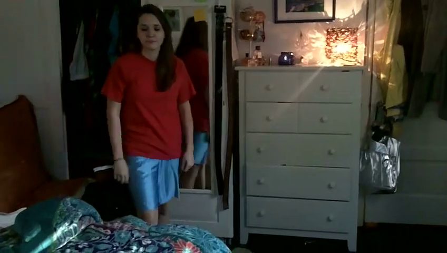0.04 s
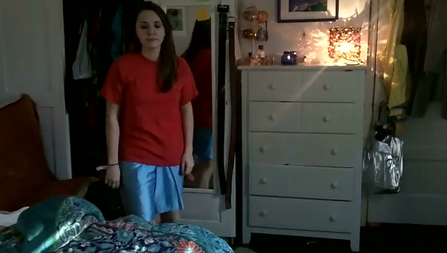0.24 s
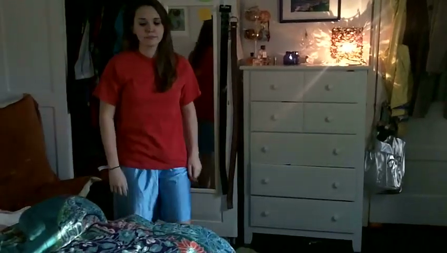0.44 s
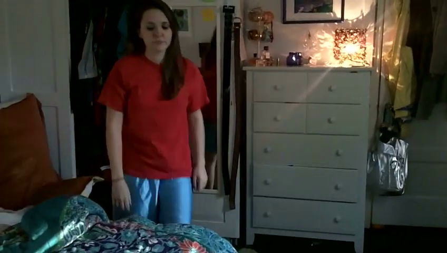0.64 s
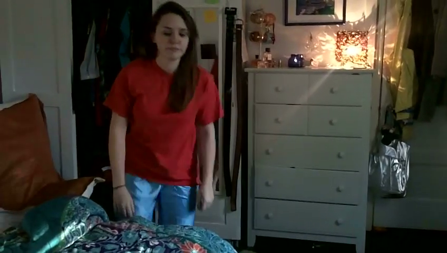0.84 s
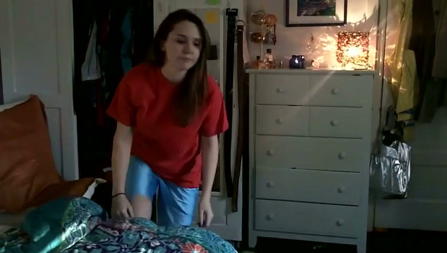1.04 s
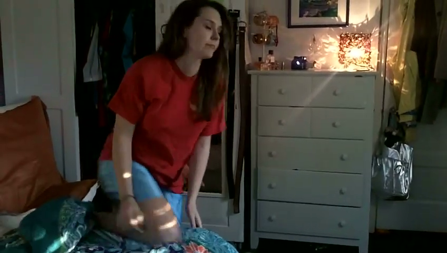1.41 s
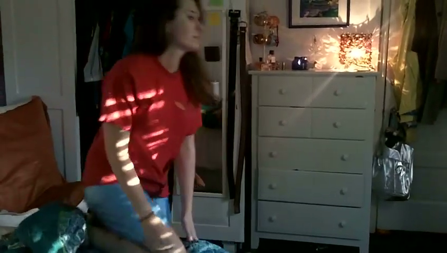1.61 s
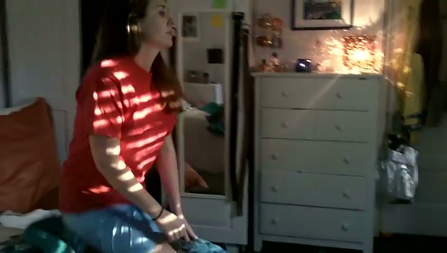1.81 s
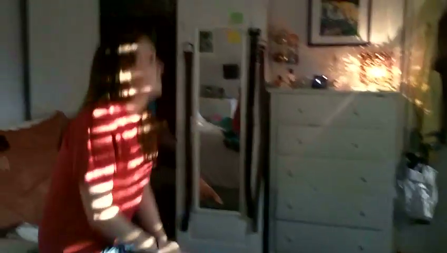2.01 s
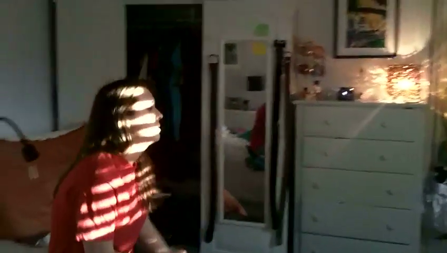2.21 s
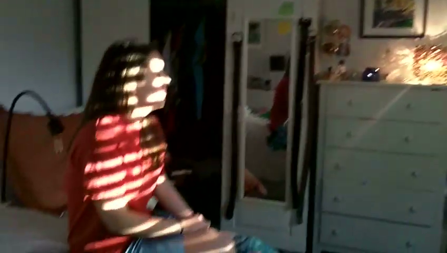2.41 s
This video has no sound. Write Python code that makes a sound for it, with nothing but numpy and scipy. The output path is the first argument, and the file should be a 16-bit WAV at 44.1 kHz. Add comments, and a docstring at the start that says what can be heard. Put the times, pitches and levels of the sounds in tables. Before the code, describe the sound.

Someone climbs onto a bed with soft thumps, rustling bedding and small creaks.

```python
"""In a quiet bedroom, someone steps up to a bed, kneels on it and sits down.
Footsteps shake the floor, and the mattress thuds and knocks its wooden slats under the weight.
Clothes and quilt swish as they rub. The frame snaps once as a joint lets go, then creaks, and a
rubbing spring squeaks. Under it all lie a low rumble, faint hiss and a thin electrical buzz."""
import sys
import numpy as np
from scipy import signal
from scipy.fft import rfft, irfft
from scipy.io import wavfile
from scipy.ndimage import uniform_filter1d

SR = 44100
rng = np.random.default_rng(int(sys.argv[2]) if len(sys.argv) > 2 else 0)


def bounce(signal):
    """Save signal as a 16-bit WAV file at the path given by the first command-line argument."""
    frames = np.transpose(np.atleast_2d(signal))
    limited = np.clip(frames, -1, 1)
    pcm = np.round(limited * 32767).astype(np.int16)
    wavfile.write(sys.argv[1], SR, pcm)


N = 112454
T = np.arange(N) / SR

# the notes the wooden slats ring at (pitch [Hz], level [dB], ring time [s])
SLAT_MODES = [(568.5, -0.5, 0.15), (817, 1.5, 0.082), (967, -8, .12)]


def floorboards():
    """Each footstep sways the floor; its deep note sags as the weight settles. A rumble lies below."""
    # footsteps (time [s], level [dB])
    steps = [(0.206, -19), (0.355, -38), (0.488, -40), (0.788, -36), (0.882, -39), (1.023, -46),
             (2.192, -31.5), (2.254, -36)]
    # tone of the rumble (frequency [Hz], level [dB])
    rumble_tone = [(10, 4.5), (26, 0), (55, -14.5), (200, -70.5)]
    start_hz, sag_share, sag_s, peak_s = 37.25, 0.41, 0.039, 0.028
    t, out = T[:SR // 2], np.zeros(N)
    hz = start_hz * (1 - sag_share * (1 - np.exp(-t / sag_s)))
    sway = (t / peak_s * np.exp(1 - t / peak_s)) ** 1.49 * sine(hz)
    for s, db in steps:
        add(out, s, amp(db) * sway)
    return out + amp(-49.5) * colour(rng.standard_normal(N), rumble_tone)


def mattress():
    """Each soft push rings the spot where it lands and the low notes of the frame."""
    # weight landing on the mattress (time [s], level [dB], pitch [Hz])
    thuds = [(.322, -51, 240.4), (1.615, -47, 161.5), (1.645, -43, 148), (1.708, -38.5, 178),
             (2.064, -43, 160), (2.116, -43, 153), (2.173, -35.5, 111), (2.211, -37, 115),
             (2.233, -33, 133), (2.263, -33.5, 131.5), (2.452, -34.5, 149.5)]
    # low notes of the frame (pitch [Hz], level [dB], ring time [s])
    frame_notes = [(106.7, 5, 0.33), (261.6, -4.5, 0.43), (346, -6, 0.21), (452.5, -14, 0.24)]
    rise_s, ring_s = 0.0015, 0.11
    out, frame = np.zeros(N), amp(-7.5) * ring(frame_notes)
    soft_start = 1 - np.exp(-(T[:len(frame)] / rise_s) ** 2)
    for s, db, hz in thuds:
        add(out, s, amp(db) * soft_start * (ring([(hz, 0, ring_s)]) + frame))
    return out


def cloth():
    """Clothes and quilt rub all along and swish with each move; once, a knee slides over the quilt."""
    # swishes (peak time [s], rise [s], fall [s], muffled push [dB], brush [dB], fizz [dB])
    swishes = [(0.042, 0.052, 0.016, -62.5, -94, -81), (0.244, 0.039, 0.063, -70, -65.5, -70),
               (0.332, 0.02, 0.033, -58, -59.5, -64), (.427, 0.01, 0.034, -58.5, -61.5, -59),
               (.812, 0.0036, 0.038, -65, -68, -63), (.89, 0.04, 0.033, -56, -67.5, -73),
               (0.943, 0.0058, .026, -62, -52, -62.5), (1.21, 0.072, 0.045, -66, -69, -70),
               (1.404, 0.013, 0.035, -58, -58.5, -69.5), (1.706, 0.01, 0.031, -54.5, -56, -51),
               (2.074, 0.012, 0.059, -53, -59, -73), (2.174, 0.019, 0.028, -47.5, -47, -55),
               (2.232, 0.014, 0.028, -49, -43, -50.5), (2.263, 0.013, 0.022, -40.5, -50, -81),
               (2.448, 0.012, 0.04, -47.5, -49, -57)]
    # constant rubbing of the bedding (time [s], level [dB])
    rubbing = [(0, -67.5), (.18, -72.5), (.4, -69), (.7, -74.5), (1, -70), (1.3, -71.5), (1.5, -66),
               (1.65, -60.5), (1.85, -61.5), (2.03, -60.5), (2.2, -59), (2.36, -56), (2.55, -58.5)]
    # tones of the cloth's low push, middle brush and high fizz (frequency [Hz], level [dB])
    push_tone = [(40, 13.5), (130, 10.5), (330, 5.5), (550, 5), (850, -1.5), (1500, -47), (4000, -56)]
    brush_tone = [(100, 4.5), (400, -3), (800, 3.5), (1400, 1), (2200, -1), (3000, -14), (5000, -38),
                  (9000, -59)]
    fizz_tone = [(1000, -45), (2300, -17), (3300, -3.5), (4200, -4.5), (4900, -8), (5600, -26.5),
                 (6800, -24.5), (8000, -51), (15000, -34)]
    # tones of the knee's bright slide and lower scrape (frequency [Hz], level [dB])
    slide_tone = [(3500, -12), (4800, 5), (6500, -5), (7300, -16), (8200, -29), (10000, -19), (15000, -35)]
    scrape_tone = [(450, -4.5), (780, 3), (950, -5), (1450, -1.5), (2280, -4), (5000, -44)]
    rub = amp(np.interp(T, *np.transpose(rubbing)))
    powers = np.outer(amp([-0.5, 0, -2.5]), rub) ** 2  # one row each: push, brush, fizz
    for peak_s, rise_s, fall_s, *levels_db in swishes:
        powers += np.outer(amp(levels_db), swell(peak_s, rise_s, fall_s)) ** 2
    slide = amp(-51.5) * swell(peak_s=1.703, rise_s=0.012, fall_s=0.039) * colour(fibres(), slide_tone)
    scrape = amp(-46) * swell(peak_s=1.702, rise_s=0.018, fall_s=0.036) * colour(fibres(), scrape_tone)
    out = slide + scrape
    for power, tone in zip(powers, (push_tone, brush_tone, fizz_tone)):
        out += np.sqrt(power) * colour(fibres(), tone)
    return out


def fibres():
    """Threads catch in thousands of tiny clicks over a smooth rubbing noise."""
    catches_per_s, spread_db, smooth_share = 4000, 2.5, 0.72
    sizes = rng.standard_normal(N) * amp(spread_db * np.minimum(rng.exponential(1, N), 4))
    catches = sizes * (rng.random(N) < catches_per_s / SR)
    return np.sqrt(1 - smooth_share) * unit(catches) + np.sqrt(smooth_share) * rng.standard_normal(N)


def slats():
    """The slats knock against the frame, muffled by the mattress."""
    # wooden knocks (time [s], level [dB])
    knocks = [(2.176, -44), (2.229, -52), (2.247, -41), (2.259, -39)]
    rise_s = 0.0025
    out, wood = np.zeros(N), ring(SLAT_MODES)
    soft_start = 1 - np.exp(-T[:len(wood)] / rise_s)
    for s, db in knocks:
        add(out, s, amp(db) * soft_start * wood)
    return out


def frame_snap():
    """A joint under load lets go in a quick run of bright, ringing cracks, heard as one snap."""
    # cracks (time [s], level [dB])
    cracks = [(1.9083, -29.5), (1.911, -32), (1.917, -30), (1.9305, -37), (1.9405, -36), (1.959, -42)]
    # notes each crack rings (pitch [Hz], level [dB], ring time [s])
    crack_notes = [(3410, -2, .03), (3490, -3, .03), (3880, -3, .022), (4390, -4, .025), (4750, -9, .025),
                   (5830, -13, .05), (5960, -20, .05), (7030, -25, .09)]
    # tone of each crack's burst of noise (frequency [Hz], level [dB])
    burst_tone = [(3300, -2), (4500, 0.5), (5400, -22), (9500, -18)]
    burst_fall_s, band_hz = 0.0034, [3100, 6600]
    ticks, bursts, tick = np.zeros(N), np.zeros(N), ring(crack_notes)
    for s, db in cracks:
        add(ticks, s, amp(db) * tick)
        add(bursts, s, amp(db) * np.exp(-T / burst_fall_s))
    noise = amp(-9) * bursts * colour(rng.standard_normal(N), burst_tone)
    return signal.sosfilt(signal.butter(3, band_hz, "bandpass", fs=SR, output="sos"), ticks + noise)


def spring_squeaks():
    """A rubbing spring sings one nearly steady note, with a weaker, wavering one just below it."""
    # squeaks (start [s], length [s], level [dB])
    squeaks = [(2.33, .038, -56), (2.391, .052, -52), (2.44, .08, -63)]
    main_hz, lower_hz = 3997, 3845
    main_waver, lower_waver, roughness = (
        unit(signal.fftconvolve(noise, np.hanning(170), "same")) for noise in rng.standard_normal((3, N)))
    main = sine(main_hz * (1 + .005 * main_waver))
    lower = amp(-6) * sine(lower_hz * (1 + .025 * lower_waver))
    note = unit((main + lower) * (1 + .65 * roughness))
    return note * sum(amp(db) * stroke(s, length) for s, length, db in squeaks)


def frame_creaks():
    """A joint sticks and slips in short, uneven runs, ringing itself and, more weakly, the slats."""
    # creaks (start [s], length [s], level [dB], pitch [Hz])
    creaks = [(1.799, 0.021, -59, 1395), (2.273, 0.025, -57.5, 1410), (2.355, 0.039, -57.5, 1397),
              (2.382, 0.053, -60, 770), (2.396, .06, -59.5, 1926), (2.433, 0.031, -54.5, 1394)]
    slips_per_s, unevenness, ring_s = 330, .6, .045
    pace = 1 + unevenness * unit(uniform_filter1d(rng.standard_normal(N), size=80))
    slips_so_far = np.floor(np.cumsum(slips_per_s * abs(pace)) / SR)
    slips = np.diff(slips_so_far, prepend=0)  # one click for each slip
    out, wood = np.zeros(N), amp(-9) * ring(SLAT_MODES)
    for s, length, db, hz in creaks:
        creak = signal.fftconvolve(slips * stroke(s, length), ring([(hz, 0, ring_s)]) + wood)[:N]
        out += amp(db) * unit(creak) * np.sqrt(length / T[-1])  # level over the creak's own length
    return out


def room(x):
    """The short, blurred echo of a furnished bedroom; its highs die a little sooner than its lows."""
    low_ring_s, high_ring_s, split_hz = .33, .27, 2000
    t = T[:SR // 2]
    echoes = rng.standard_normal(len(t)) * (t > .004)
    lows = signal.sosfilt(signal.butter(2, split_hz, fs=SR, output="sos"), echoes)
    tail = lows * amp(-60 * t / low_ring_s) + (echoes - lows) * amp(-60 * t / high_ring_s)
    return signal.fftconvolve(x, tail / np.linalg.norm(tail))[:N]


def hiss_and_buzz():
    """Faint hiss, and tiny electrical ticks so fast that they blend into a thin buzz."""
    # tone of the hiss both sides share (frequency [Hz], level [dB])
    hiss_tone = [(20, -9), (70, 0), (115, 13.5), (170, 1.5), (300, 5.5), (600, -8.5), (3200, -13),
                 (4500, -13), (5700, -12.5), (7800, -38), (9500, -22), (12000, -33), (15000, -37)]
    gap_s, first_s, width_s, tick_hz = 1 / 59.94, .0096, .00011, 8100
    from_tick_s = (T - first_s + gap_s / 2) % gap_s - gap_s / 2
    buzz = np.exp(-(from_tick_s / width_s) ** 2) * np.cos(2 * np.pi * tick_hz * from_tick_s)
    side_hiss = amp(-78.5) * np.diff(rng.standard_normal((2, N + 1)))  # bright; each side has its own
    return amp(-66) * colour(rng.standard_normal(N), hiss_tone) + amp(-63.5) * buzz + side_hiss


def amp(db):
    """Turns decibels into a number to multiply by."""
    return 10 ** (np.asarray(db) / 20)


def unit(x):
    """Scales a sound to an average strength (rms) of 1."""
    return x / np.sqrt(np.mean(x ** 2) + 1e-20)


def add(mix, s, sound):
    """Mixes a sound in, starting at s seconds."""
    part = mix[max(round(s * SR), 0):][:len(sound)]
    part += sound[:len(part)]


def sine(hz):
    """A pure note that follows a changing pitch."""
    return np.sin(2 * np.pi * np.cumsum(hz) / SR)


def colour(x, tone):
    """Shapes a sound's lows and highs by a tone table, at an average strength of 1."""
    hz, db = np.transpose(tone)
    curve_db = np.interp(np.log(np.fft.rfftfreq(N, 1 / SR) + 1), np.log(hz), db)
    return unit(irfft(rfft(x) * amp(curve_db), N))


def ring(notes):
    """A struck object, with a peak of 1: each note fades by 60 dB over its ring time."""
    t = T[:SR // 2]
    out = sum(amp(db - 60 * t / ring_s) * np.sin(2 * np.pi * hz * t) for hz, db, ring_s in notes)
    return out / abs(out).max()


def swell(peak_s, rise_s, fall_s):
    """A loudness curve that rises smoothly, then dies away."""
    return np.exp(-(np.minimum(T - peak_s, 0) / rise_s) ** 2 - np.maximum(T - peak_s, 0) / fall_s)


def stroke(start, length):
    """Pressure that comes and goes in a flat-topped arch."""
    return np.sqrt(abs(np.sin(np.pi * np.clip((T - start) / length, 0, 1))))


def scene():
    """All the sounds, heard from two close points, left and right; the bass is the same in both."""
    left_delay_s, same_below_hz = .000021, 450
    thuds = mattress() + slats()
    joints = spring_squeaks() + frame_creaks()
    snap = frame_snap()
    right = cloth() + joints + snap + room(amp(-2.5) * joints + amp(-5.5) * snap)
    hz = np.fft.rfftfreq(N, 1 / SR)
    delay_s = left_delay_s * (1 - np.exp(-(hz / same_below_hz) ** 4))  # highs reach the left later
    left = irfft(rfft(right) * np.exp(-2j * np.pi * hz * delay_s), N)
    return np.array([left, right]) + floorboards() + thuds + amp(-5.5) * room(thuds) + hiss_and_buzz()


def record(dry):
    """Fades both ends, cuts three narrow gaps in the highs and removes the very highest sound."""
    # gaps in the highs (frequency [Hz], width [Hz])
    notches = [(2730, 520), (5490, 1470), (10950, 730)]
    fade_s, top_hz = .003, 15150
    out = dry * np.minimum(np.minimum(T, T[::-1]) / fade_s, 1)
    for hz, width in notches:
        out = signal.lfilter(*signal.iirnotch(hz, hz / width, SR), out)
    low_pass = signal.firwin(511, top_hz, window=("kaiser", 9), fs=SR)
    return signal.oaconvolve(out, low_pass[None], "same")


dry = scene()
out = record(dry)
bounce(out)
```